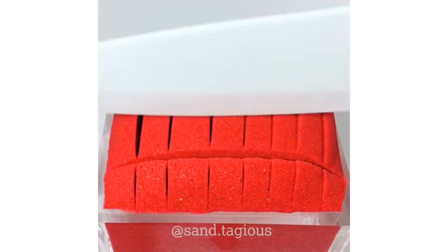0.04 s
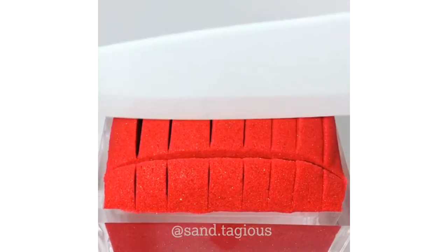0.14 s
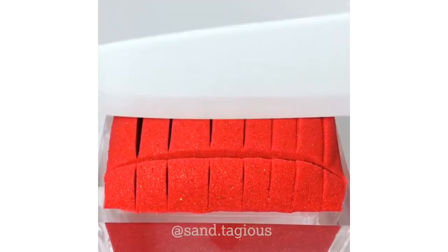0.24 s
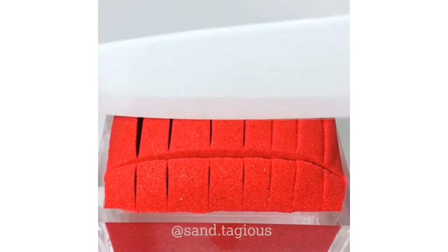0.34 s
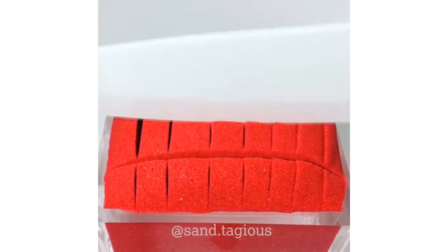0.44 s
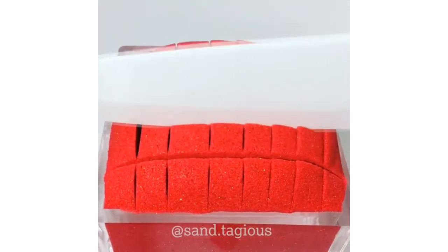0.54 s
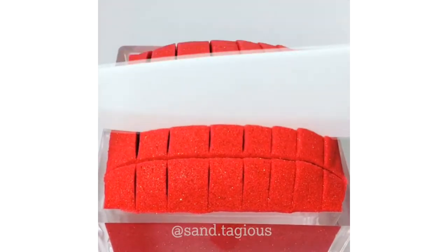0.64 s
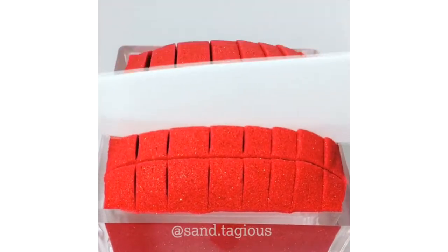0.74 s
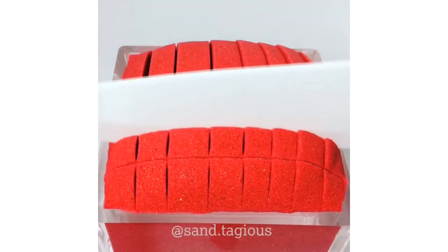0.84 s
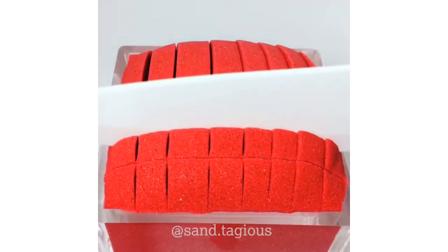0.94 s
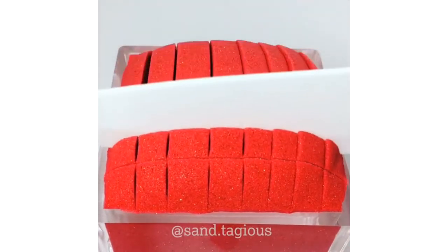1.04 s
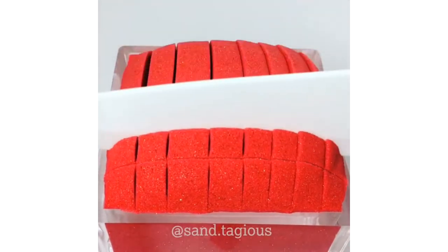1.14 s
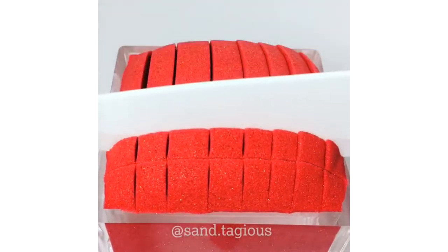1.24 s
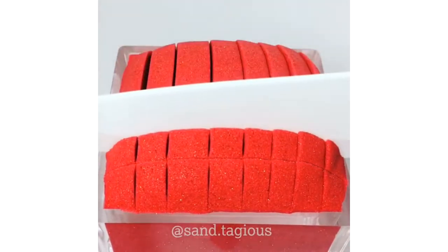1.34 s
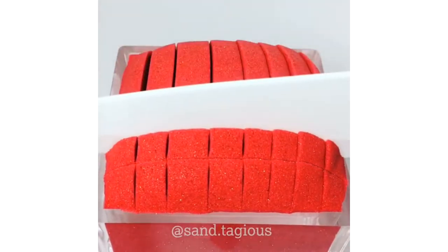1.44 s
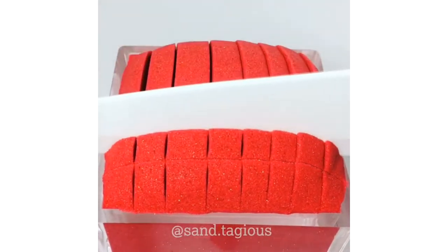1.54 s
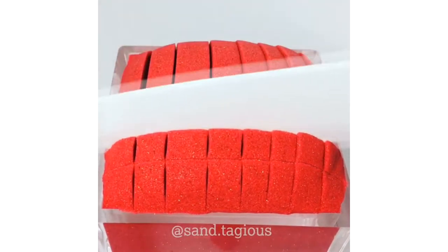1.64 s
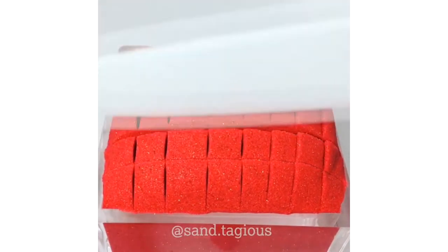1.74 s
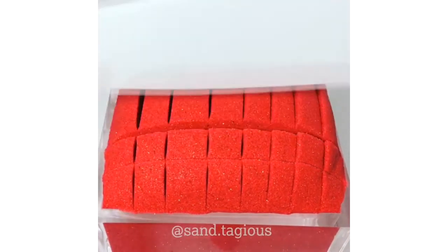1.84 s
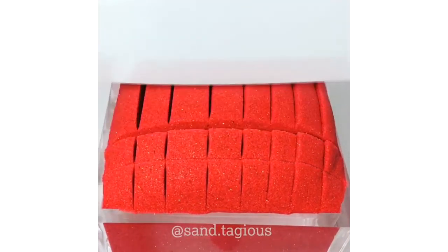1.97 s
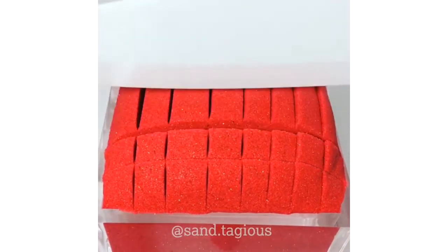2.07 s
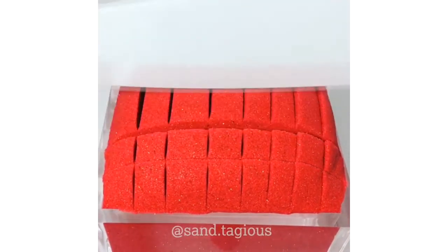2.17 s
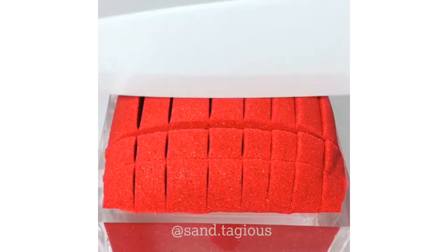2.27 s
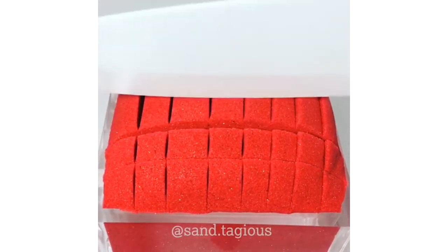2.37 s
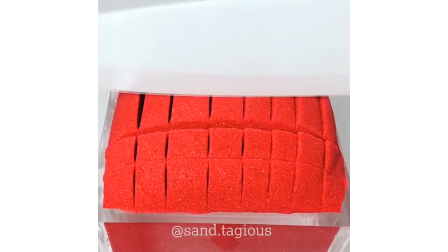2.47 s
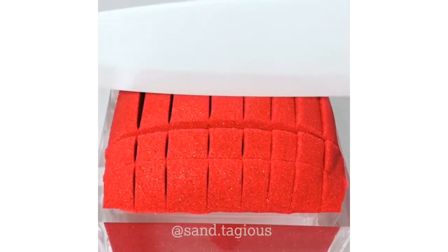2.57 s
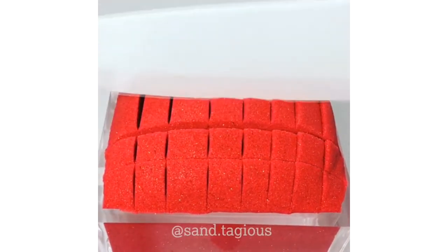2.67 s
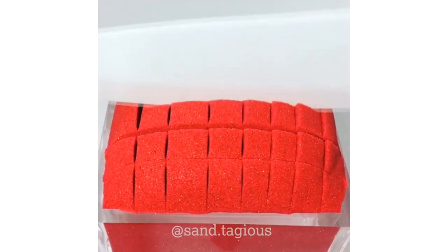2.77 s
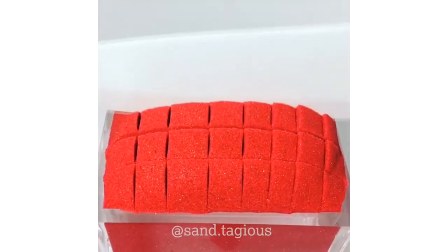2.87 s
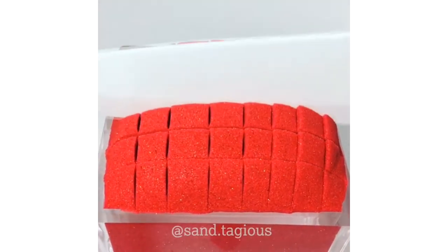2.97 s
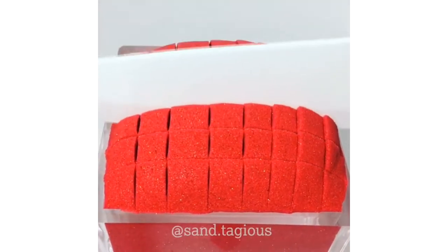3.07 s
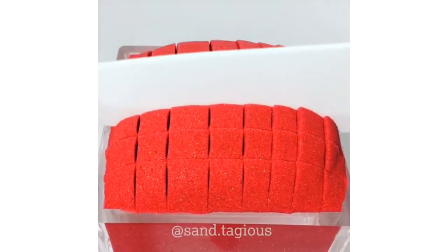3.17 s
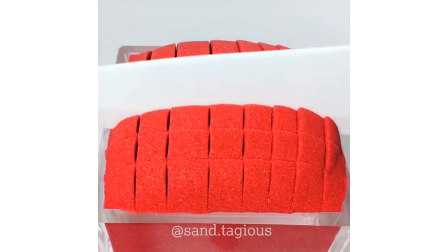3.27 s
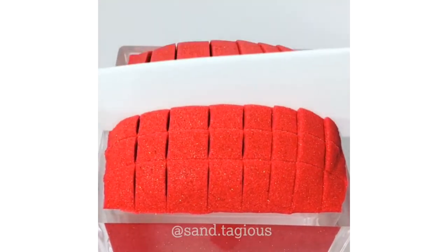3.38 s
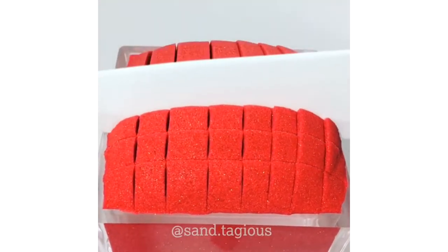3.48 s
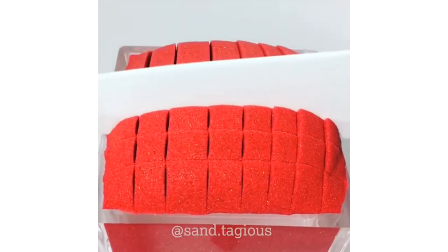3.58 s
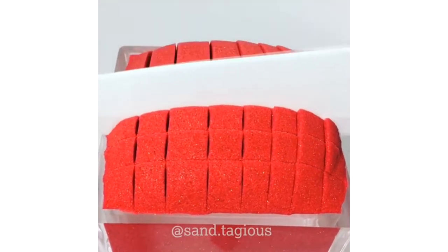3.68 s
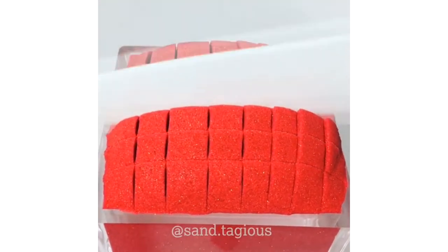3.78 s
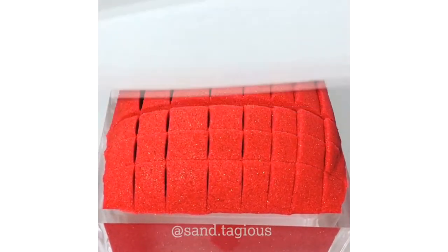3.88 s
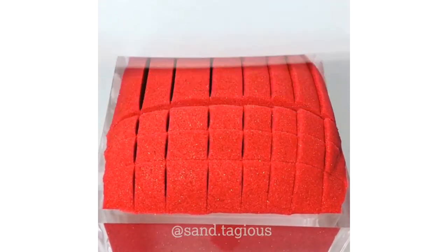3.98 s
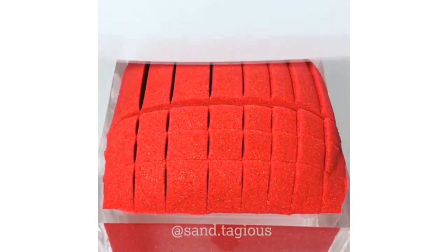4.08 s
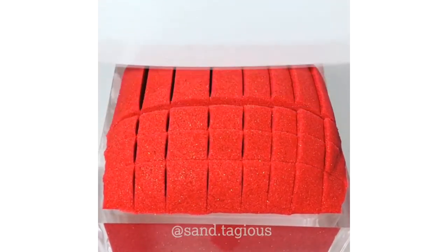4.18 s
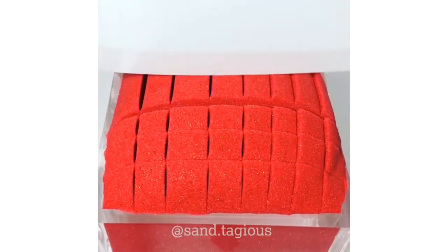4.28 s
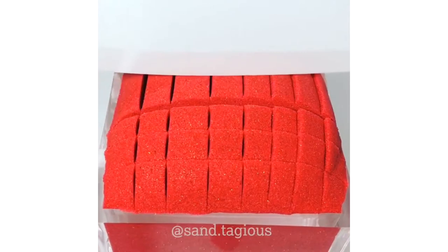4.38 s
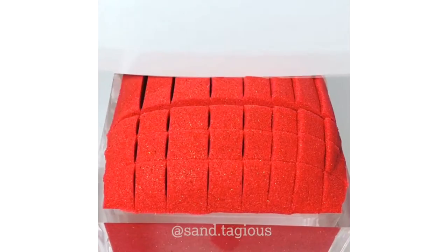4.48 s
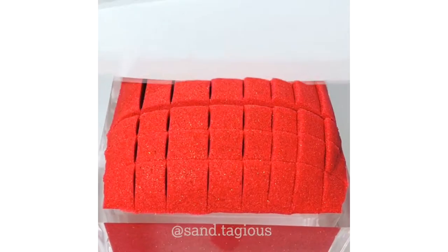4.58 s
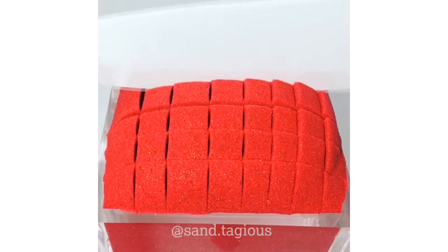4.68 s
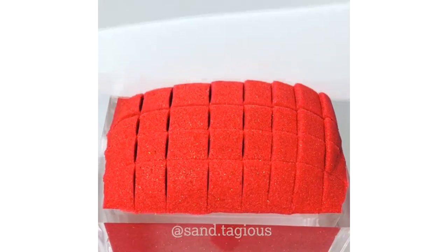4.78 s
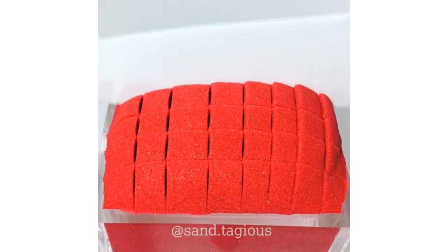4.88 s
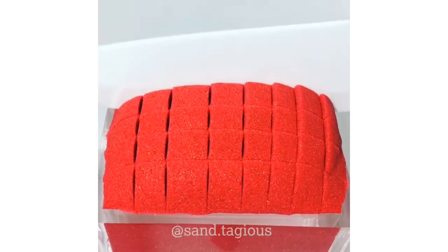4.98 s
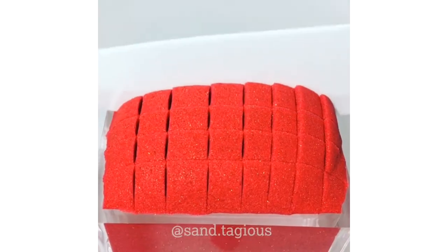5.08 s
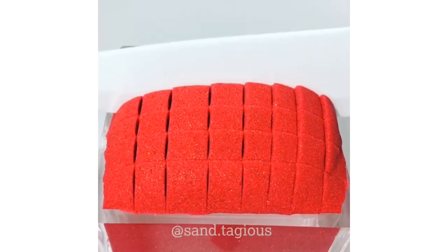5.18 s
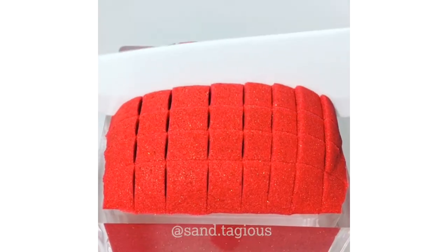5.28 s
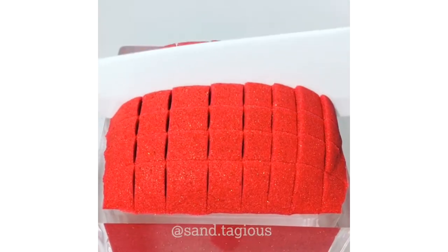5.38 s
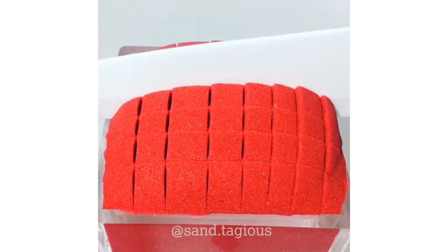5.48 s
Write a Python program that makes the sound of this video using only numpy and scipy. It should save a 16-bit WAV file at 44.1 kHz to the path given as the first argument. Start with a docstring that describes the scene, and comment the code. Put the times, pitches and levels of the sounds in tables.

```python
"""A plastic knife presses three times through a block of moist sand, close to a small microphone.
Grains slip under the edge: their random impulses excite damped modes of the blade, the block and its tray.
Sand damps the buried blade; most modes of the edge and finest grit ring longer when it is free.
Crackles (noise bursts) and thuds (decaying sines) mark touch and lift. Room hum and hiss are shaped noise."""
import sys
import numpy as np
from scipy import signal
from scipy.fft import rfft, irfft, next_fast_len
from scipy.io import wavfile
from scipy.ndimage import uniform_filter1d

SR = 44100
rng = np.random.default_rng(int(sys.argv[2]) if len(sys.argv) > 2 else 0)


def digitize_waveform(pressure):
    """Quantize a signal to 16-bit integers and store it at the path in sys.argv[1].

    Rows of a 2-D input are taken as channels; values are limited to [-1, 1].
    """
    field = np.atleast_2d(pressure).T
    bounded = np.clip(field, -1, 1)
    quanta = np.round(bounded * 32767).astype(np.int16)
    wavfile.write(sys.argv[1], SR, quanta)


N = 243431  # samples


def gain_of(db):
    """Amplitude ratio of a level in decibels."""
    return 10 ** (np.asarray(db) / 20)


def evened(x):
    """Normalises the signal to rms 1."""
    return x / np.sqrt(np.mean(x ** 2) + 1e-20)


def add(mix, s, sound):
    """Superposes rows of sound on the mix from second s."""
    part = mix[:, round(s * SR):][:, :sound.shape[1]]
    part += sound[:, :part.shape[1]]


def wander(seconds):
    """Random modulation of rms 1: noise averaged twice over the given time."""
    size = max(int(seconds * SR), 1)
    smooth = uniform_filter1d(rng.standard_normal(N), size)
    return evened(uniform_filter1d(smooth, size))


def coloured(points, level_db):
    """Stationary noise: a random spectrum weighted by levels interpolated over log frequency."""
    size = next_fast_len(N)
    hz, db = np.transpose(points)
    bins_hz = np.fft.rfftfreq(size, 1 / SR)
    shape = gain_of(np.interp(np.log(bins_hz + 1), np.log(hz + 1), db))
    noise = irfft(rfft(rng.standard_normal(size)) * shape, size)[:N]
    return gain_of(level_db) * evened(noise)


def ringing(force, modes):
    """Modal superposition: a force drives damped resonators, their power shares summing to 1."""
    shift_db, shift_s = 1.17, 0.018  # the contact point shifts, so each mode's drive drifts
    hz, width, db = np.transpose(modes)
    share = gain_of(db) * np.sqrt(width)
    turns = 2 * np.pi * hz / SR  # phase advance a sample
    radii = np.exp(-np.pi * width / SR)  # decay a sample
    out = np.zeros(N)
    for k, (turn, r) in enumerate(zip(turns, radii)):
        drive = force * gain_of(shift_db * wander(shift_s))
        ring = signal.lfilter([0, np.sin(turn)], [1, -2 * r * np.cos(turn), r * r], drive)
        # alternate signs between neighbouring modes; the root evens out their noise power
        out += (-1) ** k * share[k] * np.sqrt(2 * (1 - r * r)) * ring
    return out / np.linalg.norm(share)


def paths(level_db, *rest_db):
    """Transfer gains from one force to the grit, block, flat, blade, edge and finest grit."""
    return gain_of(level_db + np.array([0 * level_db, *rest_db]))


def colour(table, place):
    """Spectral balance at a place: linear interpolation of a table's level columns."""
    at, *columns = np.transpose(table)
    return np.array([np.interp(place, at, c) for c in columns])


def contact(out, start, end, levels):
    """Amplitude envelope of one faded contact; levels(t) gives grit dB and the five other path levels."""
    t = np.arange(start, end + .014, 1 / SR)
    fade = np.clip(np.minimum(t - start, t[-1] - t) / .009, 0, 1)
    level_db, rest_db = levels(t)
    add(out, start, paths(level_db, *rest_db) * fade)


def slips():
    """Stick-slip as a random impulse train: grains let go, a few of them large, in quick surges."""
    slips_per_s, spread_db = 7000, 2
    surge_db, surge_s = 0.7, 0.0014
    size = gain_of(spread_db * np.minimum(rng.exponential(1, N), 5))
    sign = rng.choice([-1., 1.], N)
    force = size * sign * (rng.random(N) < slips_per_s / SR)
    return evened(force * gain_of(surge_db * wander(surge_s)))


def lurches():
    """Shot-noise modulation: small clumps give way at random, each a jump in the grit that dies fast."""
    snaps_per_s, t60_s = 80, .014
    snap_db = 5  # largest snap re the running grit
    t = np.arange(2048) / SR
    snaps = rng.random(N) ** 2 * (rng.random(N) < snaps_per_s / SR)
    jumps = signal.oaconvolve(snaps, gain_of(-60 * t / t60_s))[:N]
    return evened(1 + gain_of(snap_db) * jumps)


def hum():
    """Low room hum as stationary noise with a peaked spectrum."""
    # relative spectrum of the hum: f/Hz, level/dB
    hum_spectrum = [(2.9, -100), (5.0, 2.5), (20, -5), (35, -4.5), (49, -18), (81, -21), (100, -18),
                    (117, -15), (145, -26.5), (161, -18), (182, -21), (206, -32.5), (241, -41), (292, -39),
                    (330, -60), (430, -105), (730, -120)]
    return coloured(hum_spectrum, -33)  # rms dB


def hiss():
    """Faint broadband hiss as stationary noise falling towards the treble."""
    # relative spectrum of the hiss: f/Hz, level/dB
    hiss_spectrum = [(180, -72), (300, -4.5), (450, -11), (584, -9.5), (721, -21), (949, -14.5),
                     (1130, -22.5), (1380, -19), (1570, -24), (7100, -30), (14500, -33.5)]
    return coloured(hiss_spectrum, -70)  # rms dB


def rests(out):
    """Quasi-static loading: the free blade rests on the sand and the grit level moves linearly in dB."""
    # rests before the cuts, grit rising or slowly falling: start t/s, end t/s, grit level at start/dB,
    # at end/dB, then re grit: block shake/dB, blade and its flat/dB
    rest_table = [(0.25, 0.474, -76, -71.5, 21.5, 3.7), (2.336, 2.578, -77.5, -79, 23.5, 1),
                  (2.656, 2.737, -74, -68.5, 21, 1), (4.446, 4.525, -82, -70, 22, 2.6)]
    # every rest, re grit: edge ring/dB, finest grit/dB
    bright_db = [-2, 1]
    for start, end, first_db, last_db, block_db, ring_db in rest_table:
        def levels(t):
            grit_db = np.interp(t, [start, end], [first_db, last_db])
            return grit_db, np.outer([block_db, ring_db, ring_db, *bright_db], 1 + 0 * t)
        contact(out, start, end, levels)


def thuds():
    """Damped oscillation: jolts of the block on its tray and one tick of the edge, each a decaying sine."""
    # jolts and tick: t/s, level/dB of half the undamped swing, f/Hz, t60/s
    thud_table = [(0.2597, -27.5, 126, 0.047), (.562, -23, 90, 0.02), (1.829, -40.5, 383, 0.032),
                  (2.3465, -25.5, 158, 0.024), (3.7591, -30, 8900, 0.0077), (3.7595, -18, 820, 0.0058),
                  (3.7621, -41, 690, 0.01), (3.8017, -30, 795, 0.0049), (4.341, -28, 198, 0.0073)]
    t, out = np.arange(4096) / SR, np.zeros((1, N))
    for s, db, hz, t60 in thud_table:
        swing = 2 * gain_of(db - 60 * t / t60) * np.sin(2 * np.pi * hz * t)
        add(out, s, swing[None])
    return out[0]


def crackles():
    """Impulsive fracture: each clump breaks with one snap and a short dying spray of grains."""
    # loudest single crackles: t/s, level/dB, then re that level: block shake/dB, flat scrape/dB, blade ring/dB
    crackle_table = [(0.2619, -49, 16, 1, 7.5), (0.2764, -57, 0, -7, 2), (0.2966, -47.5, 0, -2, 1),
                     (0.3356, -52.5, 12, 5, 4.5), (0.349, -53, 11, 13, 4), (0.391, -56, 2, -9, -9),
                     (0.4184, -59, -3, -5, -8), (0.4407, -46, 0, -12, -11), (0.449, -49.5, 8, 0, -1.5),
                     (0.5057, -45, 28.5, 0, 7), (0.5788, -31.5, -6, -13, -15), (0.667, -23, -14, -17, -13),
                     (0.811, -43, -5, -5, -12), (1.1954, -36, -7, 7, 0), (1.253, -40, -10, 9, -12),
                     (1.5039, -39, -11, 5, -8), (1.5273, -44.5, -12, 16, -17), (1.534, -38.5, -12, 8, -14),
                     (1.6556, -47.5, -13, 0, -5), (1.7907, -39, -8, -19, 5), (2.3462, -40.5, 9, 8, 7.5),
                     (2.367, -48, -2, -4, 3), (2.3736, -52, 3, -6, -11), (2.392, -50, 19, 7, 2),
                     (2.416, -46.5, 6, -2, -16), (2.4326, -50.5, 21, 8, 2), (2.4383, -54, 12, 7, -11),
                     (2.4963, -51, 3, -16, -2), (2.5365, -48.5, 11, 0, 0), (2.5476, -49, 23, -3, 3),
                     (2.567, -37.5, 15, -1, -5), (2.578, -37.5, 20, -6, -3), (2.5904, -41, 3, -18, -4),
                     (2.614, -49, 16, -8, -12), (2.6663, -51.5, -4, -14, -11), (2.681, -50, -5, -10, -11),
                     (2.6985, -44, 1, -11, -5), (2.7175, -43, -4, -13, -10), (3.069, -33, -3, -9, -4),
                     (3.258, -47, -7, -5, -13), (3.414, -34, -14, 4, -8), (3.564, -41, -4, 2, -13),
                     (3.7591, -28.5, 0, 14.5, -11), (3.8004, -46, 0, 15, -5), (3.8068, -39, -2, 13.5, -11),
                     (4.342, -43, -1, 7, 12.5), (4.462, -55, 17, -2, -4), (4.4775, -60, 5, -8, 0),
                     (4.4907, -52, 1, -11, -11), (4.5106, -53, 20, -5, 3), (4.5874, -34, 3, -8, -17),
                     (4.66, -25.5, 1, -14, -12), (4.7369, -25.5, 19, -12, 4.5)]
    # mean levels re the crackle: edge ring/dB, finest grit/dB
    mean_bright_db = [-2, 1]
    spread_db, t60_s = 4, 0.012
    t, out = np.arange(2048) / SR, np.zeros((6, N))
    chance = rng.standard_normal((len(crackle_table), len(t) + 2))
    for (s, *levels), row in zip(crackle_table, chance):
        bright_db = np.array(mean_bright_db) + spread_db * row[:2]
        spray = row[2:]
        burst = 0.59 * spray * gain_of(-60 * t / t60_s) * np.minimum(t / 0.001, 1)
        burst[0] -= 1.5  # the snap
        add(out, s, paths(*levels, *bright_db)[:, None] * burst)
    return out


def cuts():
    """Granular friction on the buried blade; its spectral balance follows the time into each cut."""
    # blade buried, one list a cut: t/s, grit level/dB
    cut_levels = [
        [(0.47, -66), (0.518, -51.5), (0.6, -46.5), (0.62, -37), (0.718, -44), (0.744, -39.5), (0.756, -46.5),
         (0.856, -48.5), (0.866, -44), (1.064, -54.5), (1.2, -54.5), (1.224, -59.5), (1.266, -56),
         (1.28, -61.5), (1.518, -64.5), (1.538, -60), (1.57, -83)],
        [(2.71, -63.5), (2.766, -48), (2.842, -35.5), (2.878, -38), (2.978, -41.5), (3.01, -46), (3.258, -51),
         (3.444, -57), (3.56, -59), (3.66, -63), (3.69, -74), (3.746, -68)],
        [(4.53, -67.5), (4.6, -45.5), (4.64, -52), (4.692, -33.5), (4.708, -42), (4.75, -41), (4.81, -42),
         (4.828, -39.5), (4.842, -43), (5.01, -46.5), (5.058, -48.5), (5.09, -52), (5.472, -60.5), (5.52, -67)],
    ]
    # as a cut deepens the block shake fades and the flat scrape grows; the edge ring dips, then rises:
    # t/s into the cut, then re grit: block shake/dB, flat scrape/dB, blade ring/dB before the cut's offset,
    # edge ring/dB, finest grit/dB
    cut_colour = [(0, 17, -8, -0.24, 0, 1.7), (0.08, 5, -5.5, -0.028, -0.95, 0.5),
                  (0.16, 6, -4.5, -3.9, -2.4, -1.3), (0.35, 8.5, 1.5, -2.2, 0.33, 1.2),
                  (0.65, 3, 2.5, -2.5, -0.29, 0.5), (1.05, 0.5, 7.5, 0.93, 3.2, 0.5)]
    # how freely the blade rings, one offset a cut: level/dB
    cut_ring_db = [0.5, 1.5, 1.05]
    block_lag_s = 0.011
    out = np.zeros((6, N))
    for (s, db), ring_db in zip(map(np.transpose, cut_levels), cut_ring_db):
        ring = ring_db * np.array([[0], [0], [1], [0], [0]])  # offset on the blade path alone

        def levels(t):
            return np.interp(t, s, db), colour(cut_colour, t - s[0]) + ring
        contact(out, s[0], s[-1], levels)
    # the heavy block smooths the push and does not follow the lurches
    block = uniform_filter1d(out[1], max(int(block_lag_s * SR), 1))
    lurch = lurches()
    return np.array([out[0] * lurch, block, *(out[2:] * lurch)]) * slips()


def slides(out):
    """Sliding friction: the free blade scrapes the surface with levels that vary along each slide."""
    # blade free, one list a slide: t/s, grit level/dB, then re grit: flat scrape/dB, blade ring/dB
    slide_levels = [
        [(1.6, -79, 6, 0), (1.66, -62, -3, -2), (1.722, -78, -4, 8), (1.784, -58.5, -17, -1),
         (1.836, -50.5, -2.5, 6), (1.86, -83, 10, -10)],
        [(2.566, -60, 2, -6), (2.594, -52.5, 5.5, -9), (2.604, -72, 8, 0), (2.616, -65.5, 6, 0),
         (2.65, -83, 5, 3)],
        [(3.765, -42.5, 17, -3), (3.773, -60, 5.5, -11), (3.805, -54, 1.5, 1), (3.851, -57, 2.5, 2),
         (3.897, -64, -8, 1), (3.925, -96, 30, 6)],
        [(4.345, -61, 20, 8.2), (4.367, -59, 4, 1.7), (4.385, -69, 2, 2), (4.4, -86, 12, 4)],
    ]
    # every slide: share of the slide's time [0-1], block over flat/dB, then re grit: edge ring/dB, finest grit/dB
    slide_colour = [(0, 6.5, 0.5, -1.5), (0.8, 12.5, -4, 2), (1.0, 5, -7, 6)]
    for s, db, flat, blade in map(np.transpose, slide_levels):
        def levels(t):
            block, edge, fine = colour(slide_colour, (t - s[0]) / (s[-1] - s[0]))
            flat_db = np.interp(t, s, flat)
            blade_db = np.interp(t, s, blade)
            return np.interp(t, s, db), (flat_db + block, flat_db, blade_db, edge, fine)
        contact(out, s[0], s[-1], levels)


def touches():
    """Granular friction on the free blade: rest and slide envelopes modulate one train of slips."""
    out = np.zeros((6, N))
    rests(out)
    slides(out)
    return out * slips() * lurches()


def knife_and_block(buried, free):
    """Modal radiation: each path has resonances with different damping for a buried and a free blade."""
    # modes of each path: f/Hz, width buried/Hz, level buried/dB, width free/Hz, level free/dB
    grit_modes = [(3730, 1800, -3, 1200, -5.5), (4750, 257, 5.5, 350, -0.5), (4910, 690, -1, 550, 0),
                  (6115, 610, 5.5, 330, -0.5)]
    block_modes = [(289, 95, -2.5, 113, -2), (370, 72, 3, 110, 0), (493, 150, -1, 113, -5)]
    flat_modes = [(688, 134, 0.5, 290, 0.26), (1103, 260, 1.5, 680, -3.6), (1498, 600, -5, 330, 0.25)]
    blade_modes = [(2056, 410, -2.5, 800, -2.5), (2500, 680, 5, 194, 10.5)]
    edge_modes = [(7610, 3200, -1.8, 1030, 7), (8570, 400, 3.2, 240, 2), (8910, 270, -1, 320, -5),
                  (10020, 480, 2.1, 850, 4.5)]
    fine_modes = [(10990, 800, -2.3, 550, -1.5), (12430, 590, -2, 470, 2.5), (13470, 270, 6, 310, 7.5),
                  (13800, 1700, -1, 1100, 0.5)]
    out = np.zeros(N)
    tables = (grit_modes, block_modes, flat_modes, blade_modes, edge_modes, fine_modes)
    for k, modes in enumerate(map(np.array, tables)):
        out += ringing(buried[k], modes[:, [0, 1, 2]])
        out += ringing(free[k], modes[:, [0, 3, 4]])
    return out


def scene():
    """Linear superposition of the ringing knife and block, the thuds and the room's hum and hiss."""
    buried = cuts()
    free = touches() + crackles()
    out = hum() + hiss() + thuds() + knife_and_block(buried, free)
    return out[None]


def record(dry):
    """Linear-phase filtering: the top treble is taken down by a step, then cut off."""
    shelf_hz, edge_hz, shelf_db = 13900, 15800, -13
    below = signal.firwin(511, shelf_hz, window=("kaiser", 9), fs=SR)
    band = signal.firwin(511, edge_hz, window=("kaiser", 9), fs=SR)
    response = below + gain_of(shelf_db) * (band - below)
    return signal.oaconvolve(dry, response[None], "same")


dry = scene()
out = record(dry)
digitize_waveform(out)
```